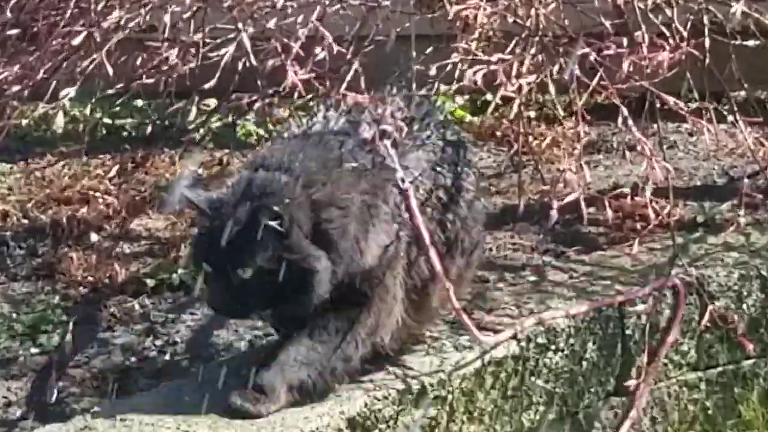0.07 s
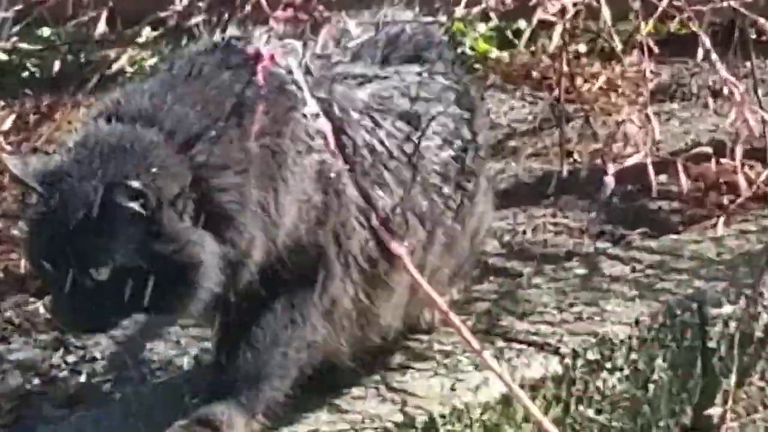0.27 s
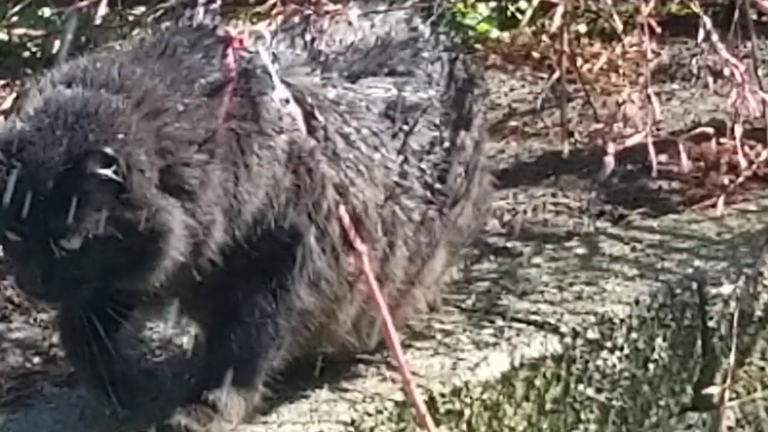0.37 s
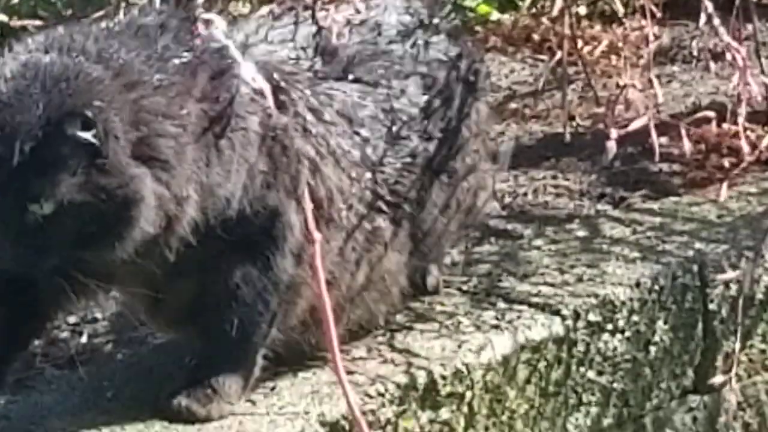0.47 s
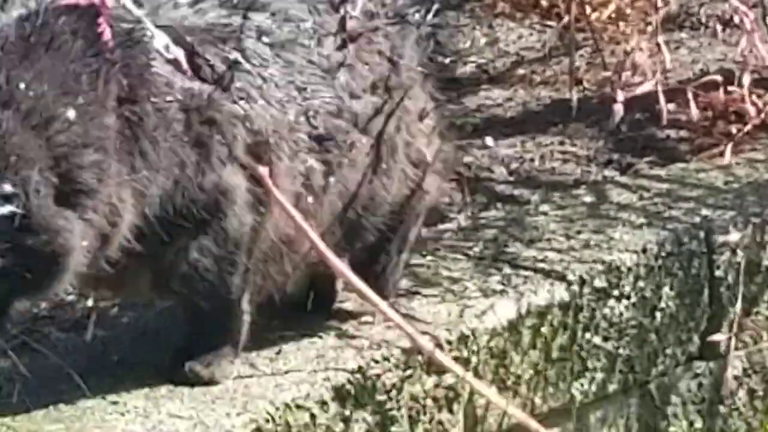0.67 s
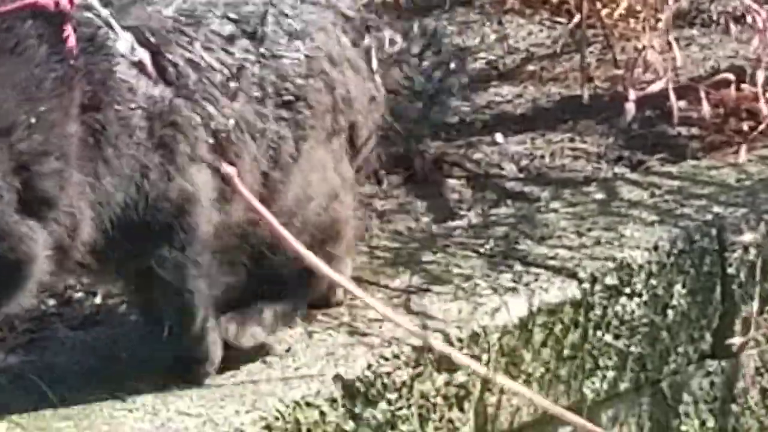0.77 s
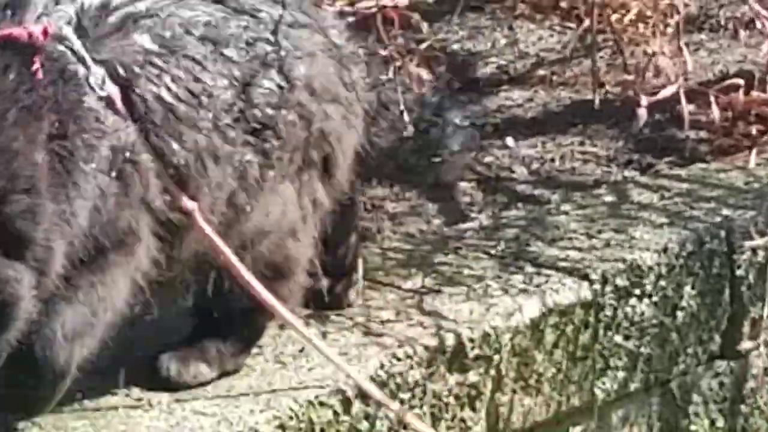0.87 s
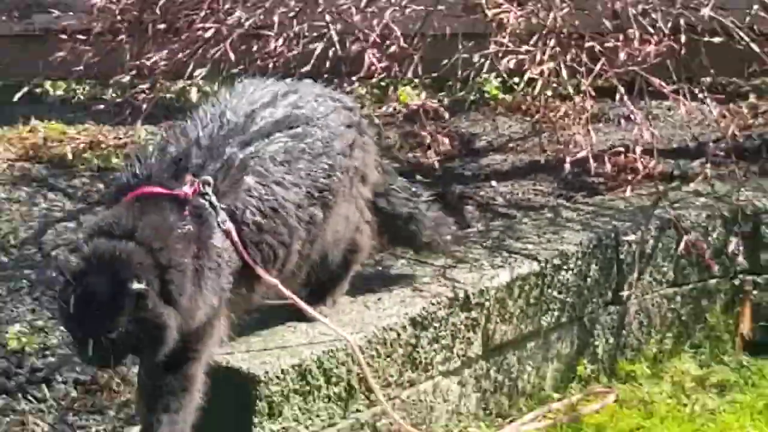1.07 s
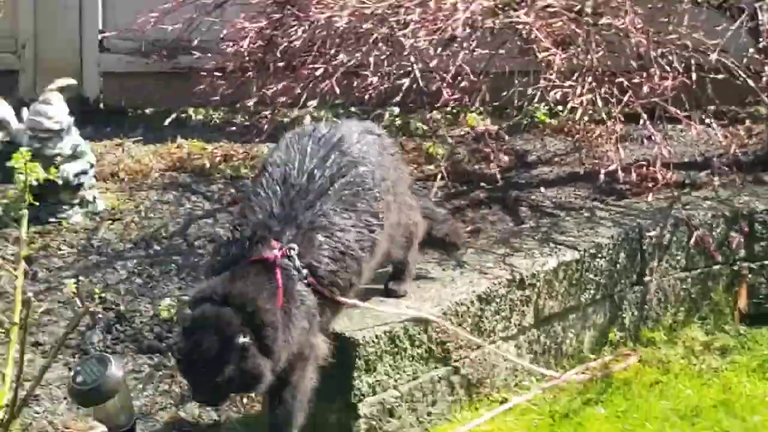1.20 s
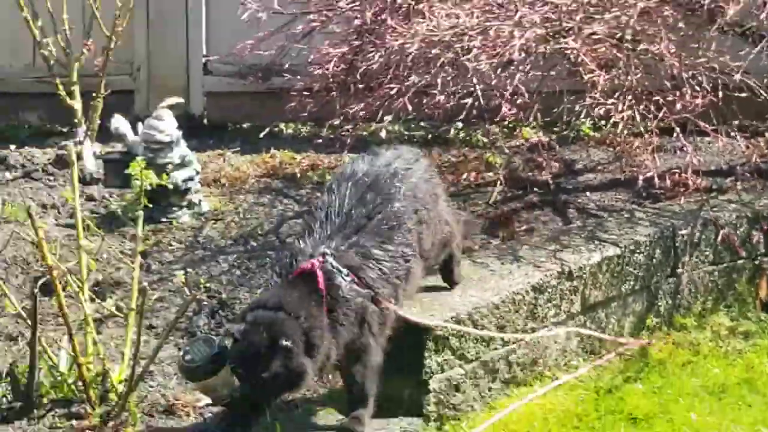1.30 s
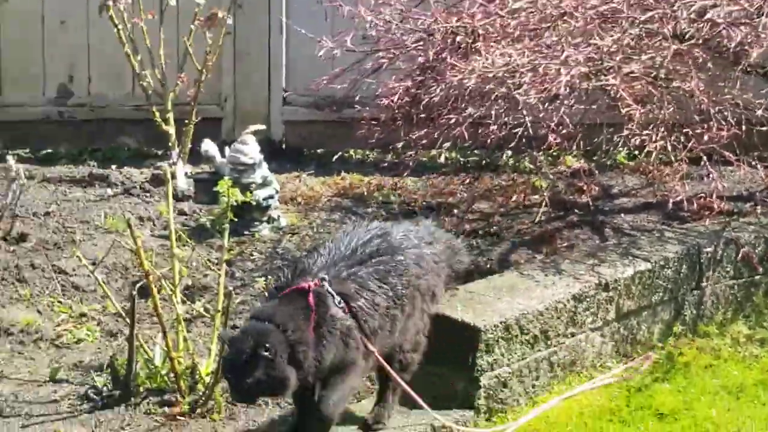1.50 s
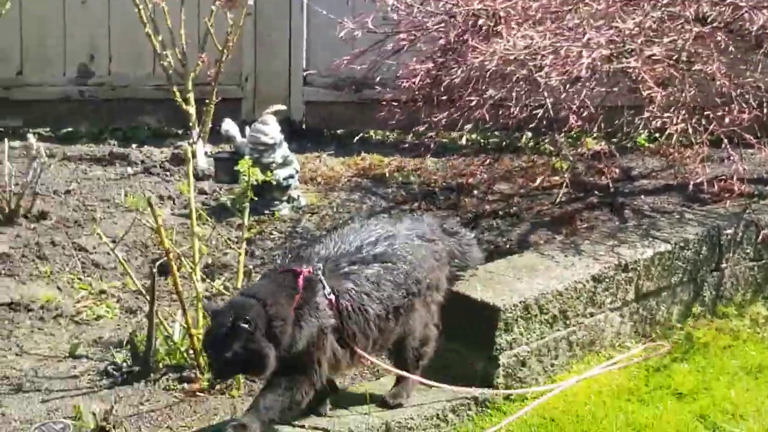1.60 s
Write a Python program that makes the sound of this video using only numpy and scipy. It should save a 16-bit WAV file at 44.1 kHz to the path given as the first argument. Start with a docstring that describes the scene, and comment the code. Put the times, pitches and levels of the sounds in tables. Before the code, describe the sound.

A small songbird gives thin, high chirps while a breeze rumbles on the microphone.

```python
"""A small songbird gives eight thin, warbling three-note contact calls in a quiet garden.
Each note is two sliding overtones shaped by the bird's throat, echoing off fence and shrubs.
A breeze flutters on both microphone ports (its openings), and one gust buffets the right one.
A few tiny ticks, a soft tap and faint leaf crackle sound over a distant hum and a steady hiss."""
import sys
import numpy as np
from scipy import signal
from scipy.fft import rfft, irfft, next_fast_len
from scipy.io import wavfile
from scipy.ndimage import uniform_filter1d, map_coordinates

SR = 44100
rng = np.random.default_rng(int(sys.argv[2]) if len(sys.argv) > 2 else 0)


def put_to_file(sound):
    """Save the sound as 16-bit audio at rate SR, in the file named by the first command-line argument."""
    columns = np.atleast_2d(sound).T  # one column per channel
    safe = np.clip(columns, -1, 1)
    whole_steps = np.round(safe * 32767)
    wavfile.write(sys.argv[1], SR, whole_steps.astype(np.int16))


N = 72765


def bird():
    """Each call is a rising flick, a double dip in pitch, then a single or a second double dip."""
    # the three note shapes: time_s, fourth_overtone_hz, gain_db
    rise = [(.0005, 4700, 0), (.0035, 5500, 3), (.0065, 5950, 0), (.009, 6950, 1), (.011, 7050, 1),
            (.013, 6850, -2), (.0168, 8200, 1), (.0203, 7300, -5), (.024, 8300, 1), (.027, 7900, -8)]
    double_dip = [(0, 7900, -6), (.0035, 6400, 0), (.008, 7500, 2), (.0115, 6450, 2), (.016, 7800, -2),
                  (.023, 7700, -7)]
    dip = [(0, 8000, -6), (.0055, 6500, 0), (.009, 7000, -1), (.014, 8000, -5)]
    # opening notes: start_s, level_db, pitch_factor, length_factor, bright_db, late_gain_db
    rises = [(0.015, -41.5, 0.89, 0.9, 7, -3.5), (0.454, -43.5, 0.96, 0.96, 13.5, 0.5),
             (0.61, -43, 1.05, .97, 2, 7.5), (.872, -43.5, 1.026, 0.98, 8.5, 2.5),
             (1.066, -47.5, 0.97, 0.98, 10.5, 3.5), (1.189, -45, 1, 1, -0.5, 4),
             (1.407, -44.5, 1.005, 1, 4, -2.5), (1.584, -45.5, 0.99, 1, -3, 1)]
    # notes that dip twice or once: start_s, level_db, pitch_factor
    double_dips = [(0.0499, -45, 0.94), (0.069, -50, 0.92), (0.482, -44, 1), (.505, -44.5, 0.97),
                   (0.636, -41, 0.99), (0.8986, -45.5, 0.97), (1.093, -43, 1), (1.1137, -45.5, 1),
                   (1.2187, -49.5, 1.03), (1.432, -45, 1.036), (1.6116, -45.5, 0.99)]
    dips = [(.6612, -41, 1.04), (.923, -45, 1.01), (1.2535, -51.5, 0.77), (1.4565, -47, 1.02),
            (1.6357, -44.5, 1.02)]
    # which side hears the bird louder: pitch_hz, left_minus_right_db
    balance = [(6000, 3), (7200, -4.5), (8000, -6.5), (8800, 5.5), (10500, 1.5)]
    out = np.zeros((2, N))
    for start_s, db, pitch, stretch, bright_db, late_db in rises:
        add(out, start_s, amp(db) * garden_echo(note(rise, pitch, bright_db, stretch, late_db)))
    for shape, notes in (double_dip, double_dips), (dip, dips):
        for start_s, db, pitch in notes:
            add(out, start_s, amp(db) * garden_echo(note(shape, pitch, bright_db=-1)))
    calls = filtered(out, lambda hz: pan(along(balance, hz)))
    return left_first(calls, seconds=0.0004595)


def note(shape, pitch, bright_db, stretch=1, late_db=0):
    """One warbled, raspy note: overtones of a lower base tone slide through the throat's resonance."""
    # how the throat favours some pitches: pitch_hz, gain_db
    throat = [(4000, -24), (4800, -22), (5500, -15), (6200, -4.5), (6700, 0.5), (7500, 0.5), (8200, -6.5),
              (9000, -12.5), (10200, -14), (11200, -40)]
    # overtones of the voice: multiple_of_base_tone, gain_db
    overtones = [(4, -2), (5, -3)]
    times, fourth_overtone_hz, db = np.transpose(shape)
    times = times * stretch
    t = np.arange(SR // 30) / SR
    drift = 1 + .009 * wobble(200, len(t)) + .016 * wobble(1500, len(t))  # warble and rasp
    base_hz = uniform_filter1d(np.interp(t, times, fourth_overtone_hz), size=50) * pitch * drift / 4
    edges = np.clip(np.minimum(t - times[0], times[-1] - t) / .0009, 0, 1)
    second_half = np.clip((t / times[-1] - .45) / .15, 0, 1)
    rough_db = 2.6 * wobble(582, len(t))
    level = edges * amp(np.interp(t, times, db) + late_db * second_half + rough_db)
    phase = 2 * np.pi * np.cumsum(base_hz) / SR
    voice = 0
    for multiple, gain_db in overtones:
        overtone_hz = multiple * base_hz
        treble_db = bright_db * np.clip((overtone_hz - 7000) / 2000, 0, 1)
        voice += amp(gain_db + along(throat, overtone_hz) + treble_db) * np.sin(multiple * phase)
    return np.sqrt(2) * level * voice


def garden_echo(voice):
    """A note at both ports, with its quick scatter from fence and shrubs and a faint tail."""
    t = np.arange(SR // 3) / SR
    age_s = np.maximum(t - .002, 0)
    echo = 0
    for db, fade_s in (-7.5, .055), (-10.5, .2):  # scatter, then tail; each falls 60 dB in fade_s
        tail = rng.standard_normal((2, len(t))) * amp(-60 * age_s / fade_s) * (age_s > 0)
        echo += amp(db) * unit(tail) / np.sqrt(len(t))
    heard = signal.fftconvolve(voice[None], echo, axes=1)
    add(heard, 0, voice)
    return heard


def wind():
    """Wind rumbles at each port; small, brighter swirls of air grow faster in the gust."""
    # wind rumble level at each port (the right briefly cuts out twice after the gust): time_s, level_db
    left = [(0, -40), (.12, -44.5), (.24, -40), (.37, -48), (.42, -38), (.53, -49.5), (.69, -41),
            (.92, -39), (.97, -46.5), (1.09, -42.5), (1.39, -43.5), (1.5, -49.5), (1.65, -46.5)]
    right = [(0, -41.5), (.08, -42.5), (.39, -45.5), (.43, -34.5), (.54, -33.5), (.575, -18), (.65, -31),
             (.71, -31.5), (.76, -22), (.87, -22), (.94, -43), (1.0, -81), (1.12, -34.5), (1.2, -87),
             (1.3, -45), (1.65, -48.5)]
    # tone of the rumble and of the swirls: pitch_hz, gain_db
    rumble_tone = [(20, -50), (35, -20), (50, -2), (68, 2.5), (100, -9), (150, -22), (250, -32),
                   (400, -38.5), (900, -83), (3000, -110)]
    swirl_tone = [(40, -83), (100, 1.5), (160, 6), (300, -2.5), (450, -14.5), (700, -28.5), (1200, -54),
                  (3000, -99)]
    gust_db, flutter_db, swirl_growth = -22.5, 7.5, 1.417
    rumble_db = np.array([curve(left), curve(right)])
    rumble = noise(rumble_tone)
    rumble /= np.sqrt(np.abs(uniform_filter1d(rumble ** 2, size=2200)) + 0.06)  # even out chance swells
    swirls = unit(noise(swirl_tone) * amp(flutter_db * np.array([wobble(70), wobble(70.24)])))
    swirl_db = -30 + swirl_growth * (rumble_db - gust_db)
    return amp(rumble_db) * rumble + amp(swirl_db) * swirls


def buffets():
    """Single swirls of air strike the ports: a push between two shallow dips."""
    # puffs of air: time_s, peak_db, right_share (0 to 1), width_s
    puffs = [(.245, -20.5, 0.51, 0.0057), (0.305, -22.5, 0.5, 0.007), (.43, -16.5, 1, 0.0039),
             (0.503, -12.5, 1, 0.0064), (0.56, -13.5, 0.99, 0.0025), (.586, -16.5, 1, 0.0012),
             (0.611, -14, 0.99, 0.0016), (0.646, -11, 0.97, 0.0021), (.68, -13.5, 0.4, 0.0034),
             (0.743, -13.5, 0.6, 0.0026), (.818, -17.5, 1, 0.0013), (0.878, -15, 1, .0019),
             (1.073, -29, 0.15, 0.0029), (1.284, -31, 0.2, 0.0062), (1.38, -23.5, 0.42, 0.003),
             (1.458, -35.5, 0.2, 0.0021), (1.55, -26, 0.48, 0.0042)]
    out, t = np.zeros((2, N)), np.arange(N) / SR
    for time_s, db, right_share, width_s in puffs:
        offset = (t - time_s) / width_s
        push = (1 - offset ** 2) / (1 + offset ** 2) ** 2 * np.exp(-(offset / 6) ** 2)
        out += amp(db) * np.array([[1 - right_share], [right_share]]) * push
    return out


def ticks():
    """Tiny dry contacts, each a fading burst of noise around one pitch."""
    # ticks, a tap and their scuffs: start_s, peak_db, pitch_hz, width_octaves, fade_s, left_minus_right_db
    contacts = [(.1475, -44, 9500, 1, .005, 0), (.4195, -47, 10000, .9, .005, 0),
                (1.0555, -28.5, 15000, .45, .0045, -6), (1.059, -48, 13800, .2, .08, -3),
                (1.5093, -44, 7300, .2, .005, 0), (1.5148, -42, 780, .6, .01, 4),
                (1.528, -56, 820, .4, .28, 2)]
    out, t = np.zeros((2, N)), np.arange(N) / SR
    for start_s, db, pitch_hz, octaves, fade_s, side_db in contacts:
        burst = rng.standard_normal(N) * (t >= start_s) * amp(-60 * np.abs(t - start_s) / fade_s)
        tick = filtered(burst, lambda hz: 1 / (1 + (np.log2((hz + 1) / pitch_hz) / octaves) ** 2))
        out += amp(db) * pan(side_db) * tick / np.abs(tick).max()
    return out


def rustle():
    """Sparse crackles of leaves and grit, barely above the hiss."""
    # tone of the crackles: pitch_hz, gain_db
    tone = [(1500, -25), (6000, -2), (12500, 4), (16000, -1)]
    per_second, spread_db, fade_s = 18, 8, .008
    t = np.arange(SR // 50) / SR
    level = np.zeros((2, N))
    for when, softness, side in rng.random((round(per_second * N / SR), 3)):
        crackle = amp(-spread_db * softness - 60 * t / fade_s)
        add(level, when * N / SR, pan(10 * (side - .5)) * crackle)
    return amp(-53) * level * noise(tone)


def hum():
    """Distant outdoor hum; part comes from the right and reaches the left port later."""
    # tone of the hum: pitch_hz, gain_db
    tone = [(30, 14), (150, 4), (400, -5), (800, 1.5), (1200, 0), (2000, -11), (3000, -21.5), (6000, -25)]
    # how the hum sinks: time_s, relative_level_db
    levels = [(0.0, -59), (0.274, -64.5), (0.84, -65), (1.0, -72), (1.65, -70.5)]
    side_share = 0.34
    all_around = np.sqrt(1 - side_share) * noise(tone)
    from_right = np.sqrt(side_share) * left_first(noise(tone)[0], seconds=-0.00035)
    return amp(curve(levels) + 6) * pan(-2.5) * (all_around + from_right)


def hiss():
    """A fine, nearly steady hiss."""
    # tone of the hiss: pitch_hz, gain_db
    tone = [(1000, -8.5), (2800, -7), (3500, -5), (3900, 2.5), (4500, 0.5), (5300, -4.5), (7300, 2.5),
            (7950, 5), (8500, 1.5), (9800, -3.5), (10900, 0.5), (11900, 5.5), (12800, 5), (14000, 3)]
    # which side is louder: pitch_hz, left_minus_right_db
    balance = [(2000, -5), (4200, -3), (7000, 1), (15000, -5)]
    # its slow drift: time_s, relative_level_db
    levels = [(.45, -60), (.876, -64.5), (1.65, -62.5)]
    return amp(curve(levels) + 6.5) * filtered(noise(tone), lambda hz: pan(along(balance, hz)))


def amp(db):
    """Turn decibels into a gain."""
    return 10 ** (np.asarray(db) / 20)


def unit(x):
    """Scale to an average power of 1."""
    return x / np.sqrt(np.mean(x ** 2) + 1e-20)


def along(points, hz):
    """Read between (pitch_hz, value) points, with octaves evenly spaced."""
    pitches, values = np.transpose(points)
    return np.interp(np.log(hz + 1), np.log(pitches + 1), values)


def curve(points):
    """Join (time_s, value) points, one value per sample."""
    return np.interp(np.arange(N) / SR, *np.transpose(points))


def wobble(rate, size=N):
    """A smooth curve through `rate` random values a second."""
    return map_coordinates(rng.standard_normal(int(size * rate / SR) + 4), [np.arange(size) * rate / SR])


def pan(db):
    """Left and right gains that make the left louder by db."""
    return amp(np.array([[.5], [-.5]]) * db)


def filtered(x, response):
    """Multiply each frequency in x by response(hz)."""
    size = next_fast_len(N + SR // 4)
    return irfft(rfft(x, size) * response(np.fft.rfftfreq(size, 1 / SR)), size)[..., :N]


def noise(tone):
    """Noise of the given tone and power 1, unrelated left and right."""
    return unit(filtered(rng.standard_normal((2, N)), lambda hz: amp(along(tone, hz))))


def add(out, start_s, x):
    """Mix x into out from start_s on."""
    part = out[:, max(round(start_s * SR), 0):][:, :x.shape[-1]]
    part += x[..., :part.shape[1]]


def left_first(x, seconds):
    """Make x reach the left port this much sooner than the right."""
    return filtered(x, lambda hz: np.exp(1j * np.pi * hz * seconds * np.array([[1], [-1]])))


def scene():
    """Everything that reaches the two ports."""
    return bird() + wind() + buffets() + hum() + hiss() + ticks() + rustle()


def record(dry):
    """The microphone drops the deepest bass and highest treble; its right port has a treble notch."""
    # tone of the right port: pitch_hz, gain_db
    right_port = [(7900, 0), (8350, -12.5), (8950, -31.5), (9700, 6.5), (10400, -4)]
    low_cut_hz, top_hz = 40, 15950
    lean = signal.sosfilt(signal.butter(4, low_cut_hz, "highpass", fs=SR, output="sos"), dry)
    return filtered(lean, lambda hz: amp([np.zeros_like(hz), along(right_port, hz)]) * (hz < top_hz))


dry = scene()
out = record(dry)
put_to_file(out)
```